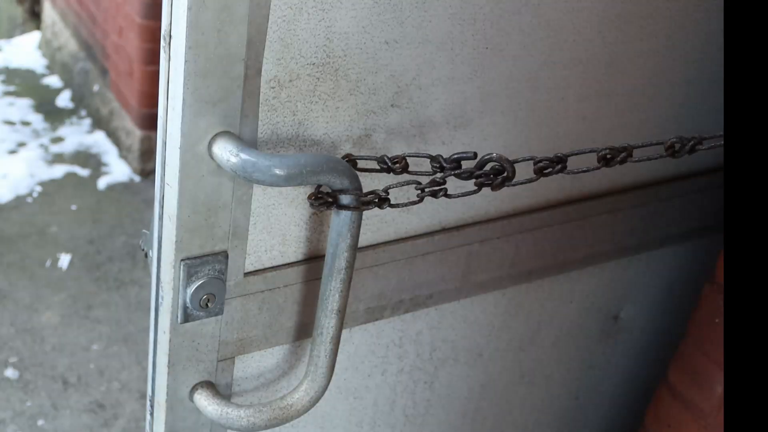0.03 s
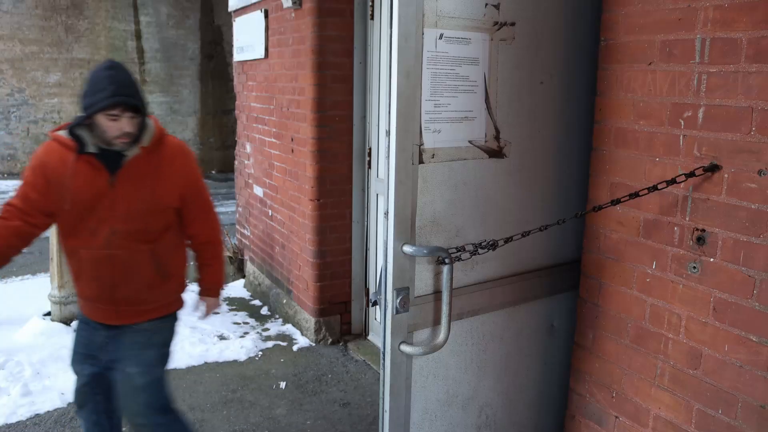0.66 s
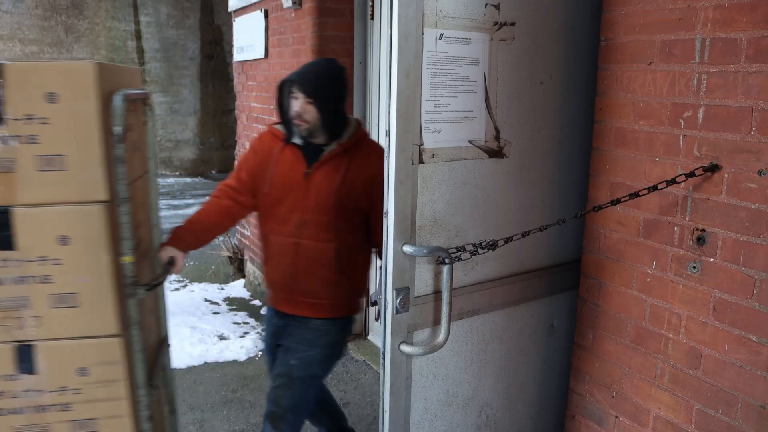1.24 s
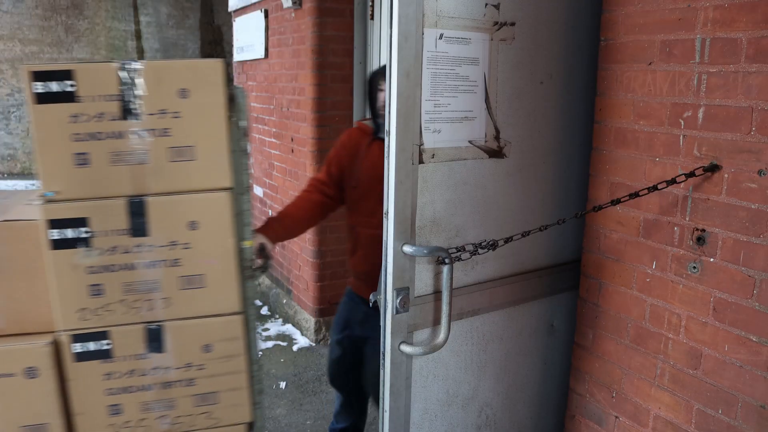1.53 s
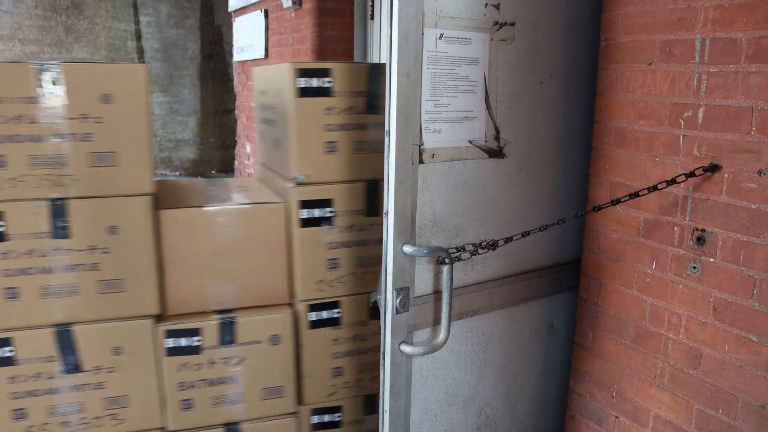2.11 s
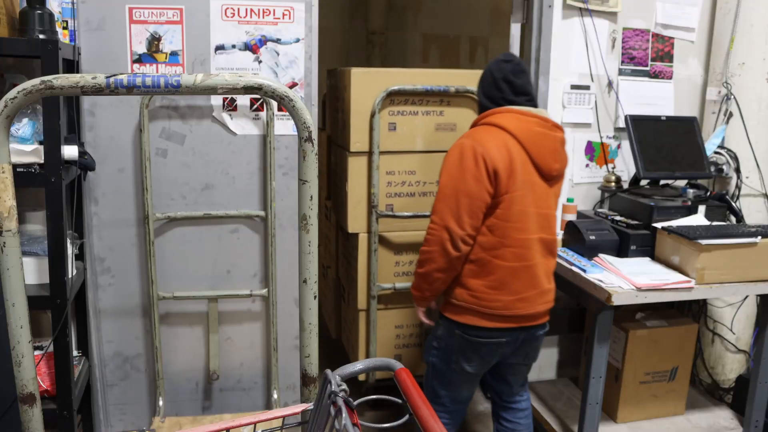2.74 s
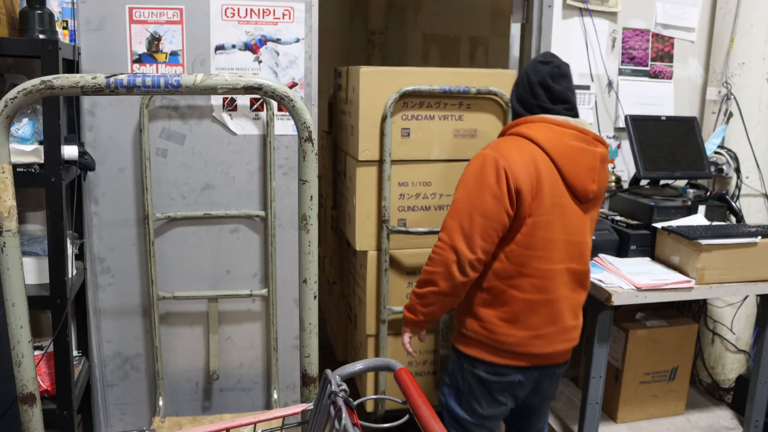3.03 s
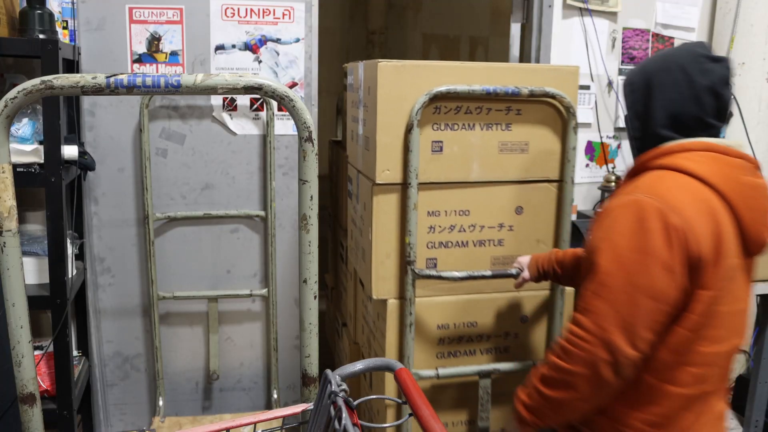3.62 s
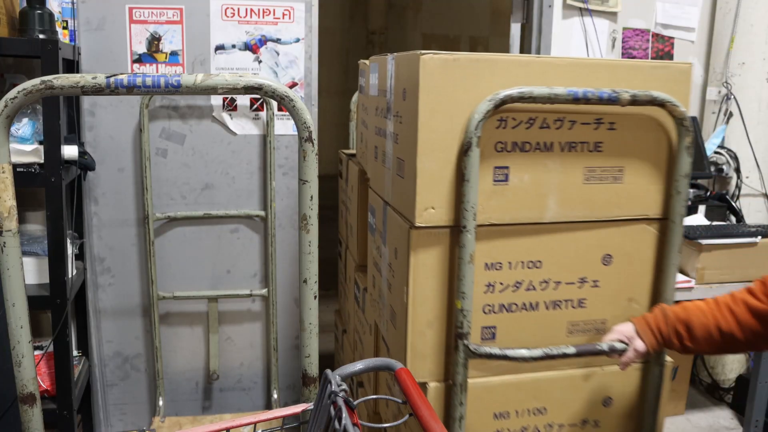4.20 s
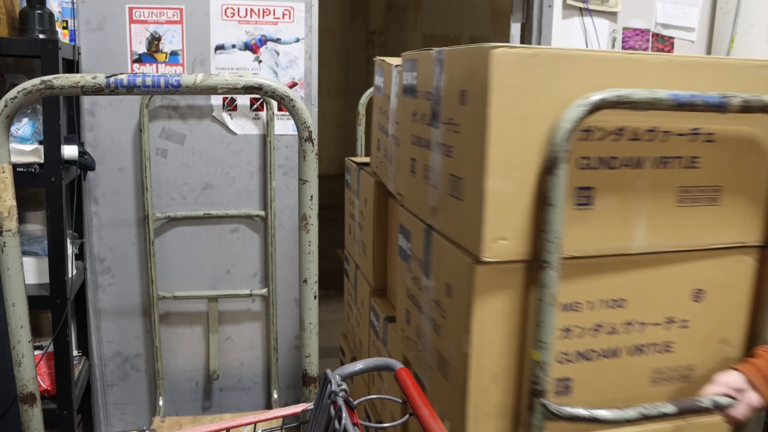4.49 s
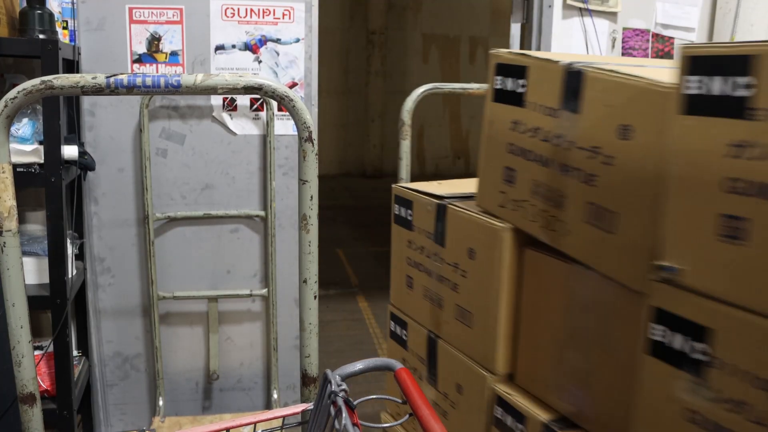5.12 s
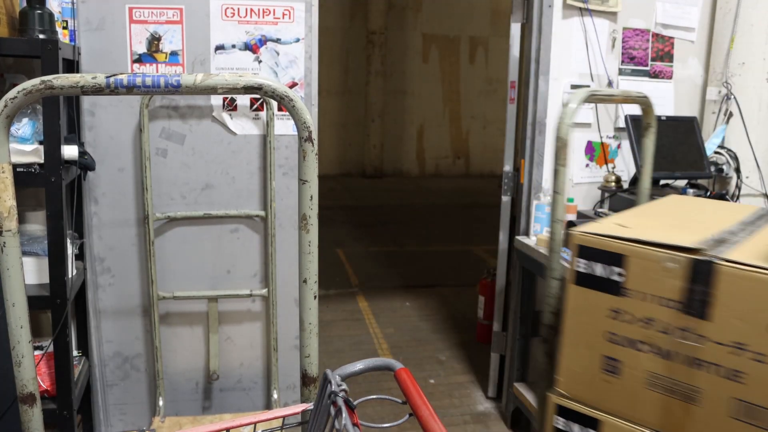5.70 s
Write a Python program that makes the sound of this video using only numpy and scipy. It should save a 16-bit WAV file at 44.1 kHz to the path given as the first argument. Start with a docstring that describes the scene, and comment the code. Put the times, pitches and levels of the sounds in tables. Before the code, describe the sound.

Loud, uneven metallic rattling starts as a loaded cart rolls across rough ground outdoors near the microphone, with dull thumps from its cardboard boxes. The clatter eases, then continues inside a storeroom as a lighter rattle with sharp ticks, short ringing clinks and a few brief scuffs. A low wheel rumble and a faint hum lie underneath, and the room adds a little reverberation.

```python
"""Rough asphalt outside a door, then a stockroom floor: a steel cage cart of cardboard boxes is pulled along.
Every bump makes loose steel parts chatter: the deck rings, the tube frame clashes and ticks, the boxes
thud. Between bumps, grit under the casters keeps up a fine rattle. The wheels rumble low beneath it
over a faint hum and hiss of air, and indoors the room answers more strongly."""
import sys
import numpy as np
from scipy import signal
from scipy.fft import rfft, irfft, next_fast_len
from scipy.io import wavfile
from scipy.ndimage import uniform_filter1d

SR = 44100
rng = np.random.default_rng(int(sys.argv[2]) if len(sys.argv) > 2 else 0)


def transcribe(signal):
    """Save signal, clipped to [-1, 1], as a 16-bit WAV file at the path in sys.argv[1]."""
    frames = np.atleast_2d(signal).T
    limited = np.clip(frames, -1, 1)
    pcm = np.round(limited * 32767).astype(np.int16)
    wavfile.write(sys.argv[1], SR, pcm)


N = 253564
TIME, RING_TIME = np.arange(N) / SR, np.arange(SR // 3) / SR
START_S, INDOORS_S = .357, 2.5
FIRM_DB = -30  # the level of a firm shake

# The wheel bumps that stand out. Each row: time in seconds, strength in dB, weight in dB
# (near 0 the whole load drops, far below only the frame clacks).
BUMPS = [(0.4, -25, -6), (0.4119, -25.5, -5), (0.4957, -21, -3.5), (0.5438, -17.5, -11.5),
         (.627, -24.5, -9.5), (0.6551, -27.5, -4), (0.6866, -21.5, -25), (0.7088, -18.5, -10),
         (0.734, -23, -3.5), (0.8154, -27.5, -32), (0.8758, -25, -7.5), (0.9011, -26.5, -6),
         (1.0444, -24, -12.5), (1.0661, -21, -9), (1.0943, -21, -7), (1.2221, -31, -8), (1.247, -34, -10),
         (1.3668, -20, -8.5), (1.379, -24.5, -6.5), (1.3904, -30, -12), (1.46, -35, -20),
         (1.589, -29, -3.5), (1.6117, -22, -8), (1.742, -30.5, -4), (1.8065, -31, -5), (1.8628, -26, -32),
         (2.003, -35, -1), (2.0558, -29, -7), (2.134, -35.5, -1), (2.153, -31.5, -6.5), (2.194, -31.5, -37),
         (2.342, -33, -5.5), (2.408, -31.5, -4), (2.4951, -34.5, -6.5), (2.5387, -32, -14.5),
         (2.559, -40, -17), (2.656, -37, -12), (2.7212, -37, -10.5), (2.817, -39.5, -11),
         (2.926, -35.5, -23), (3.0041, -33.5, -17.5), (3.0813, -35, -15.5), (3.124, -37, -12),
         (3.2082, -36.5, -10), (3.262, -36, -53), (3.3489, -34, -26), (3.3868, -34.5, -18),
         (3.4131, -35, -7), (3.5233, -33.5, -18), (3.553, -37, -8), (3.6162, -29.5, -17),
         (3.64, -32.5, -12.5), (3.705, -32, -15.5), (3.794, -32, -11.5), (3.935, -33.5, -9),
         (3.9974, -34.5, -9), (4.086, -40.5, -12), (4.1567, -38.5, -7.5), (4.239, -40.5, -6.5),
         (4.3198, -34, -9.5), (4.36, -36, -12), (4.4907, -34, -6.5), (4.552, -32.5, -19),
         (4.595, -34.5, -9.5), (4.8852, -33.5, -12.5), (4.975, -32.5, -12.5), (5.116, -43, -1.5),
         (5.1799, -32, -13), (5.232, -31, -21), (5.4303, -40, 3.5), (5.509, -41.5, -6.5)]
# The tone of the whole load's dense, short-lived modes.
# Each row: frequency in Hz, relative spectral level in dB outdoors, the same indoors.
LOAD = np.array([(60, -13, -13), (112, -5.5, -1.5), (203, 1.5, 7.0), (302, 1.0, 3.5), (536, -0.5, 1),
        (760, -2.5, -1.0), (910, 3.0, 2), (1370, -2, 1.5), (2090, 1.0, 1.0), (3590, -7.5, -5.0),
        (4020, -12.0, -14.5), (5660, -9.0, -12.5), (8700, -22.5, -25.0), (12800, -24.5, -28.0),
        (16000, -42, -44)])


def gain_of(db):
    """Decibels to amplitude."""
    return 10 ** (np.asarray(db) / 20)


def unit_rms(x):
    """Scales to an rms of 1."""
    return x / np.sqrt(np.mean(x ** 2) + 1e-20)


def at_hz(points, hz):
    """Reads a curve on a log-frequency axis."""
    f, value = np.transpose(points)
    return np.interp(np.log(hz + 1), np.log(f + 1), value)


def at_time(points, s=TIME):
    """Reads a curve over time."""
    return np.interp(s, *np.transpose(points))


def grown(db, growth):
    """Scales a level's distance from that of a firm shake."""
    return FIRM_DB + growth * (db - FIRM_DB)


def add(mix, s, sound):
    """Mixes a sound in at s seconds."""
    part = mix[max(round(s * SR), 0):][:len(sound)]
    part += sound[:len(part)]


def noise(spectrum, size):
    """Noise coloured by a curve of dB over Hz."""
    hz = np.fft.rfftfreq(size, 1 / SR)
    return unit_rms(irfft(rfft(rng.standard_normal(size)) * gain_of(at_hz(spectrum, hz)), size))


def band_noise(hz, octaves, size):
    """Noise in one broad resonance with steep skirts."""
    f = np.fft.rfftfreq(size, 1 / SR) + 1
    skirts = (1 + (np.log2(f / hz) / octaves) ** 2) ** 2
    return unit_rms(irfft(rfft(rng.standard_normal(size)) / skirts, size))


def damped(x, t60s):
    """Lets each band die at its own speed."""
    hz, t, bands = signal.stft(x, SR, nperseg=256)
    fade = gain_of(-60 * t / at_hz(t60s, hz)[:, None])
    return signal.istft(bands * fade, SR)[1][:len(x)]


def registers(x):
    """Splits the cart's sound into four bands: boxes, deck, frame, ticks."""
    # The three crossovers in Hz, low to high.
    edges_hz = [720, 1150, 4300]
    size = next_fast_len(len(x) + SR // 20)
    hz = np.fft.rfftfreq(size, 1 / SR)
    lowpasses = [1 / (1 + (hz / edge) ** 14) for edge in edges_hz]
    bands = np.diff(lowpasses, axis=0, prepend=0, append=1)
    return irfft(bands * rfft(x, size), size)[:, :len(x)]


def strike_colour(x, step_hz=260, depth_db=2.8):
    """Each blow lands on another spot, which lifts some pitches and mutes others."""
    hz, knots = np.fft.rfftfreq(len(x), 1 / SR), np.arange(0, SR / 2, step_hz)
    colour_db = depth_db * np.interp(hz, knots, rng.standard_normal(len(knots)))
    return irfft(rfft(x) * gain_of(colour_db), len(x))


def chatter(peak_s, rebounds_per_s=1000):
    """A flurry of contacts that swells to its peak and dies away."""
    age = RING_TIME[:SR // 16] / peak_s
    contacts = rng.choice([-1, 1], len(age)) * (rng.random(len(age)) < rebounds_per_s / SR)
    contacts[int(peak_s * SR)] = 1  # the main landing
    return contacts * rng.uniform(0.34, 1, len(age)) * age * np.exp(1 - age)


def blows(rows, octaves, t60, rise_s):
    """Single contacts, each in one broad resonance that dies at once."""
    out, t = np.zeros(N), RING_TIME[:SR // 6]
    fade, attack = gain_of(-60 * t / t60), 1 - np.exp(-t / rise_s)
    for s, hz, db in rows:
        blow = fade * band_noise(hz, octaves, len(t))
        blow *= np.linalg.norm(fade) / np.linalg.norm(blow)
        add(out, s, gain_of(db) * attack * blow)
    return out


def air():
    """A steady, faint bed: low hum and a thin hiss."""
    # Its tone. Each row: frequency in Hz, relative spectral level in dB.
    spectrum = [(40, 12), (150, 14), (400, -32), (1000, -31), (2000, -35), (4000, -7), (5900, -34),
                (8000, -24), (16000, -21)]
    return gain_of(-57) * noise(spectrum, N)


def wheel_rumble():
    """Wheels rolling on the ground make a deep rumble."""
    # Its swell. Each row: time in seconds, relative level in dB.
    swell = [(.4, -68), (1.5, -56), (2.4, -50), (2.75, -78), (3.3, -52.5), (4, -51), (4.9, -47),
             (5.75, -49.5)]
    # Its tone. Each row: frequency in Hz, relative spectral level in dB.
    spectrum = [(15, 15), (26, -22), (35, 9), (48, 13), (70, 1), (115, 1), (200, -11), (500, -49)]
    return gain_of(4.0 + at_time(swell)) * noise(spectrum, N)


def room(x, delay_s=0.0029):
    """Diffuse reflections from walls and shelves."""
    # The reverb's length. Each row: frequency in Hz, t60 in seconds.
    t60s = [(150, 1), (1000, 0.3), (4000, 0.33), (14000, 0.83)]
    tail = damped(rng.standard_normal(SR // 2), t60s)
    tail *= np.clip(np.arange(len(tail)) / SR / delay_s - 1, 0, 1)
    return signal.oaconvolve(x, tail / np.linalg.norm(tail))[:N]


def scuffs(octaves=0.95, grain_db=3):
    """Wheels and cardboard slide briefly, gritty from sticking and slipping."""
    # Each row: start in seconds, length in seconds, pitch in Hz, level in dB.
    slides = [(1.645, 0.094, 4130, -43.5), (2.597, .045, 7460, -57), (2.603, .045, 7500, -59),
              (4.109, 0.073, 3950, -50), (4.557, 0.14, 2400, -55), (5.366, 0.052, 3450, -48)]
    out = np.zeros(N)
    for s, length_s, hz, db in slides:
        size = int(length_s * SR)
        grain = gain_of(grain_db * unit_rms(uniform_filter1d(rng.standard_normal(size), size=100)))
        add(out, s, gain_of(db) * np.hanning(size) * unit_rms(grain * band_noise(hz, octaves, size)))
    return out


def shaking(stir_db=-14, rise_s=.024, fall_s=.052):
    """The cart's shaking in dB: the ground's share, and a swell round each bump that settles again."""
    # How hard the ground shakes the cart, fainter with distance. Each row: time in seconds, level in dB.
    rolling = [(.36, -31.5), (.68, -29), (.99, -37), (1.19, -37), (1.48, -33), (1.9, -37.5), (2.2, -35.5),
               (2.47, -42.5), (2.6, -43.5), (2.86, -49), (3.25, -44), (3.85, -46.5), (4.15, -44),
               (4.42, -44.5), (4.63, -42.5), (4.8, -47), (5.45, -42), (5.64, -49.5)]
    power = gain_of(at_time(rolling)) ** 2
    lag = np.arange(-SR // 20, SR // 4) / SR
    swell = np.exp(np.minimum(lag / rise_s, -lag / fall_s))
    for s, strength_db, _ in BUMPS:
        add(power, s + lag[0], (gain_of(strength_db + stir_db) * swell) ** 2)
    return 10 * np.log10(power)


def wire_ticks(per_s=70, under_db=-17, spread_db=5, low_hz=3800, high_hz=11000, tilt_db=-7):
    """Dry ticks of wire on wire follow the shaking: a few sharp, most faint, the higher the weaker."""
    when, height, luck = rng.random((int(per_s * N / SR), 3)).T
    at = (when * N).astype(int)
    hz = low_hz * (high_hz / low_hz) ** height
    accent = np.minimum(-np.log(1 - luck), 2)
    db = shaking()[at] + under_db + tilt_db * height + spread_db * accent
    return blows(zip(at / SR, hz, db), octaves=0.78, t60=0.015, rise_s=.0001)


def chinks(octaves=.476, bounce_s=0.0035, t60=.04, count=40):
    """Thin parts (washers, caster forks, latches) bounce and ring on a cluster of close high modes."""
    # Each row: start in seconds, pitch in Hz, relative level in dB.
    hits = [(0.548, 6140, -38), (0.597, 5960, -35.5), (0.683, 7040, -37), (0.817, 7970, -45),
            (0.945, 4650, -42.5), (1.041, 6740, -39), (1.308, 7140, -39), (1.363, 6930, -35),
            (1.456, 5900, -43), (1.739, 6030, -41.5), (2.252, 5600, -42), (2.366, 4660, -41.5),
            (3.266, 5240, -47), (4.889, 6780, -46.5), (4.976, 4810, -48), (5.417, 5340, -45)]
    out, t = np.zeros(N), RING_TIME[:SR // 20]
    for s, hz, db in hits:
        place, strength, phase = rng.uniform(-1.2, 1, (3, count, 1))
        modes = strength * np.sin(2 * np.pi * (hz * 2 ** (octaves * place) * t + phase))
        ring = modes.sum(0) * gain_of(-60 * t / t60)
        chink = signal.fftconvolve(chatter(bounce_s, rebounds_per_s=840), ring)
        add(out, s, gain_of(db - 4) * chink / chink[:SR // 70].std())
    return out


def clinks(detune=0.06, partner_db=1, bounce_s=0.0012):
    """A loose part bounces and sings on one mode; three close partners beat against it and die sooner."""
    # Short, hollow notes. Each row: start in seconds, pitch in Hz, level in dB, t60 in seconds.
    hits = [(.738, 3580, -24.5, 0.13), (3.936, 1507, -35, 0.055), (3.998, 1590, -32, 0.069),
            (4.494, 1280, -32.5, 0.051), (4.6, 773, -34.5, 0.17), (4.977, 1061, -39.5, 0.19),
            (5.18, 2290, -31, 0.096), (5.232, 945, -30, 0.2), (5.428, 954, -33.5, 0.06)]
    out, t = np.zeros(N), RING_TIME
    for s, hz, db, t60 in hits:
        fade = gain_of(-60 * t / t60)
        partners = np.zeros(len(t))
        for _ in range(3):
            partner_hz = hz * (1 + detune * rng.standard_normal())
            partners += np.sin(2 * np.pi * (partner_hz * t + rng.random()))
        ring = fade * (np.sin(2 * np.pi * hz * t) + gain_of(partner_db) * fade * partners)
        clink = signal.fftconvolve(chatter(bounce_s, rebounds_per_s=590), ring)
        add(out, s, gain_of(db) * clink * np.linalg.norm(fade) / np.linalg.norm(clink) / np.sqrt(2))
    return out


def snaps(crack_db=3, crack_s=.00025, bounce_s=.0015, ring_db=-2):
    """Steel meets steel: an instant, bright crack with a few rebounds, then a brief ring."""
    # Hard, dry clicks. Each row: time in seconds, pitch in Hz, relative level in dB.
    hits = [(0.411, 2800, -40), (1.095, 1200, -31), (1.808, 1690, -29.5), (1.937, 4640, -35.5),
            (2.097, 4900, -26.5), (2.5113, 1500, -34), (2.518, 3900, -30.5), (2.5405, 13000, -54),
            (2.541, 2630, -30.5), (2.925, 8000, -62), (3.005, 4150, -45), (3.082, 7500, -47),
            (3.264, 8000, -49), (3.35, 6800, -40.5), (3.523, 6500, -41.5), (3.704, 7350, -40.5),
            (3.794, 2680, -32.5), (3.937, 7900, -42), (4.324, 2460, -32.5), (4.586, 3340, -37),
            (4.886, 7000, -41)]
    out = gain_of(ring_db) * blows(hits, octaves=0.58, t60=0.029, rise_s=0.00022)
    t = RING_TIME[:SR // 100]
    for s, hz, db in hits:
        crack = np.sin(2 * np.pi * hz * t) * np.exp(-t / crack_s)
        cracks = signal.fftconvolve(chatter(bounce_s, rebounds_per_s=600), crack)
        add(out, s - bounce_s, gain_of(db + crack_db) * cracks / abs(cracks).max())
    return out


def clanks(octaves=.6, bounce_s=0.0046, t60=0.081):
    """Side frames bang in their sockets: many rebounds into a broad crowd of short-lived tube modes."""
    # Each row: start in seconds, pitch in Hz, level in dB.
    hits = [(.396, 1400, -28), (.407, 2770, -33), (.458, 3020, -37), (.503, 3000, -32.5),
            (0.654, 1700, -35), (.683, 2000, -34), (.709, 1700, -32), (.714, 3040, -34.5),
            (1.06, 2850, -38), (1.39, 3200, -30), (1.408, 3200, -42)]
    out, t = np.zeros(N), RING_TIME[:SR // 8]
    for s, hz, db in hits:
        ring = band_noise(hz, octaves, len(t)) * gain_of(-60 * t / t60)
        clank = signal.fftconvolve(chatter(bounce_s, rebounds_per_s=1600), ring)
        add(out, s, gain_of(db) * clank / clank[:SR // 40].std())
    return out


def box_thuds():
    """Boxes lift and land back on the deck with a soft, dull attack."""
    # Each row: start in seconds, pitch in Hz, level in dB.
    landings = [(.405, 219, -19.5), (.411, 395, -22), (.497, 258, -32), (.535, 205, -27), (.618, 190, -23),
                (.655, 450, -18), (.708, 255, -27), (.732, 217, -23), (.733, 427, -20), (.734, 760, -16.5),
                (1.054, 215, -34), (1.057, 540, -20), (1.366, 260, -19), (1.372, 475, -32),
                (1.385, 214, -21.5), (2.506, 280, -33), (4.491, 257, -39), (4.886, 252, -40),
                (5.232, 305, -35)]
    return blows(landings, octaves=0.34, t60=0.062, rise_s=0.0054)


def steel_ring(indoors, detune=.02):
    """Deck and frame ring from one contact point, which favours some modes and detunes them a little."""
    # The steel's modes. Each row: pitch in Hz, t60 in seconds (held to .03-.16 below),
    # relative level in dB outdoors, the same indoors.
    modes = [(207.7, 0.1, -6, -25), (405, 0.1, -3.5, -10), (817, 0.09, 0.5, -39), (890.3, 0.16, -1, 2.5),
             (916, 0.037, 5.5, -2), (1008.6, 0.099, -3.5, -1.5), (1375, 0.059, 0, -19),
             (1512, 0.19, -2, -3), (1887, 0.17, -8, -14), (2685, 0.085, -2.5, -9), (3247, 0.17, -0.5, -3),
             (3480, 0.068, -49, -8), (3440, 0.075, -4, -42), (3704, 0.12, -6.5, -42), (4650, 0.058, -9, -9),
             (4900, 0.14, -11, -19), (6500, .12, -36, -40)]
    hz, t60, out_db, in_db = np.transpose(modes)[:, :, None]
    offset, share, phase = rng.standard_normal((3, len(modes), 1))
    t = RING_TIME[:SR // 6]
    fade = gain_of(-60 * t / np.clip(t60, .03, .16))
    waves = np.sin(2 * np.pi * (hz * (1 + detune * offset) * t + phase)) * fade
    waves /= np.linalg.norm(waves, axis=1, keepdims=True)
    return (share * gain_of(in_db if indoors else out_db) * waves).sum(0)


def joint_ring(indoors, low_hz=1300, high_hz=9500, t60=0.046, count=16):
    """Each loose joint (bolt, washer, caster fork) has a few modes of its own."""
    t = RING_TIME[:SR // 6]
    height, phase = rng.random((2, count, 1))
    hz = low_hz * (high_hz / low_hz) ** height
    strength = gain_of(at_hz(LOAD[:, [0, 1 + indoors]], hz)) * np.sqrt(hz)
    ring = (strength * np.sin(2 * np.pi * (hz * t + phase))).sum(0) * gain_of(-60 * t / t60)
    return ring / np.linalg.norm(ring)


def cart_ring(indoors, steel_db, joint_db):
    """The cart's answer to one contact: the dull mass of the load, the steel and the struck joint."""
    # How fast the load dies away. Each row: frequency in Hz, t60 in seconds.
    t60s = [(150, 0.12), (700, 0.14), (3000, 0.082), (12000, 0.081)]
    steel = gain_of(steel_db) * steel_ring(indoors)
    load = damped(noise(LOAD[:, [0, 1 + indoors]], len(steel)), t60s)
    return load / np.linalg.norm(load) + steel + gain_of(joint_db) * joint_ring(indoors)


def rattle(indoors, contacts_per_s, lumpy_db, drum_db, frame_db, tick_db, spread_db=3, count=20):
    """Grit under the casters shakes the loose joints in little flurries, each with its own ring."""
    knots = np.arange(0, N, SR // 70)
    flurries = gain_of(lumpy_db * np.interp(np.arange(N), knots, rng.uniform(-1.18, 1, len(knots))))
    accents = gain_of(spread_db * np.minimum(rng.exponential(1, N), 2))
    contacts = flurries * accents * rng.choice([-1, 1], N)
    contacts *= rng.random(N) < contacts_per_s / SR
    shaken, struck = np.zeros(N), rng.integers(0, count, N)
    for k in range(count):
        joint = strike_colour(cart_ring(indoors, steel_db=-14.0, joint_db=-19.5))
        shaken += signal.oaconvolve(contacts * (struck == k), unit_rms(joint[:SR // 8]))[:N]
    boxes, deck, frame, ticks = registers(shaken)
    shaking_db = shaking()
    drumming = gain_of(drum_db + shaking_db) * unit_rms(boxes + deck)
    # Loose tubes wake up when shaken hard, and the fine ticks fall behind them.
    jangle = unit_rms(frame + gain_of(tick_db - 0.35 * (shaking_db - FIRM_DB)) * ticks)
    return drumming + gain_of(frame_db + grown(shaking_db, growth=1.496)) * jangle


def bumps(joints, jolt_s=.004, tap_s=.0016, thud_db=-3, deck_db=-5, clash_db=-11, tick_db=-23.5):
    """A wheel drops into a crack or over a sill; two loose joints jump and land, ringing the cart."""
    # How far a bump's weight rings the deck rather than thudding in the boxes.
    # Each row: time in seconds, dB given to the deck and taken from the boxes.
    deck_share = [(.4, -0.5), (.75, 3.5), (1.1, 6), (1.37, 0), (2.2, 0), (3.0, -2.5), (3.7, -2), (4.0, 6)]
    out = np.zeros(N)
    for s, strength_db, weight_db in BUMPS:
        peak_s = np.interp(s, [1.4, INDOORS_S], [jolt_s, tap_s])  # longer chatter on rough ground
        struck = rng.choice(joints[int(s > INDOORS_S)], 2, replace=False)
        rung = sum(signal.fftconvolve(chatter(peak_s), joint) for joint in struck)
        bands = registers(strike_colour(rung)[:SR // 5])
        bands /= bands[:, :SR // 40].std(axis=1, keepdims=True) + 1e-12
        load_db, share_db = strength_db + weight_db, at_time(deck_share, s)
        # The small ticks grow more slowly than the frame's clash, and weight damps them.
        fine_db = grown(strength_db, growth=0.91) - 0.16 * weight_db
        gains = gain_of([load_db - share_db + thud_db, load_db + share_db + deck_db,
                         strength_db + clash_db, fine_db + tick_db])
        add(out, s - .8 * peak_s, gains @ bands)
    return out


def scene():
    """The cart outdoors by a brick wall, then in the stockroom."""
    joints = [[cart_ring(indoors, steel_db=-12.5, joint_db=-11.0) for _ in range(48)]
              for indoors in (False, True)]
    inside = np.clip((TIME - INDOORS_S) * 20 + .5, 0, 1)  # 50 ms crossfade at the door
    outside = 1 - inside
    asphalt = rattle(False, contacts_per_s=1100, lumpy_db=4.5, drum_db=-2.0, frame_db=-5, tick_db=-1.5)
    concrete = rattle(True, contacts_per_s=650, lumpy_db=5.5, drum_db=-3.5, frame_db=-2.5, tick_db=-2.5)
    impacts = box_thuds() + bumps(joints) + clanks() + clinks() + chinks() + wire_ticks() + snaps()
    cart = impacts + scuffs() + outside * asphalt + inside * concrete
    walls = room(cart * (gain_of(-14.5) * outside + gain_of(-9.5) * inside))
    fade_in = np.clip((TIME - START_S) * 500, 0, 1)
    return (fade_in * (cart + walls + wheel_rumble() + air()))[None]


def record(dry):
    """Cuts the treble above 15.9 kHz."""
    lowpass = signal.firwin(511, 15900, window=("kaiser", 9), fs=SR)
    return signal.oaconvolve(dry, lowpass[None], "same")


dry = scene()
out = record(dry)
transcribe(out)
```